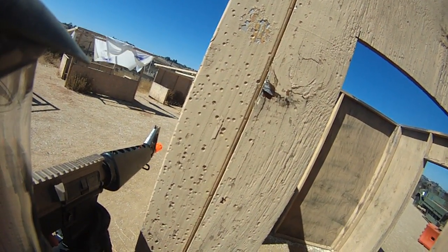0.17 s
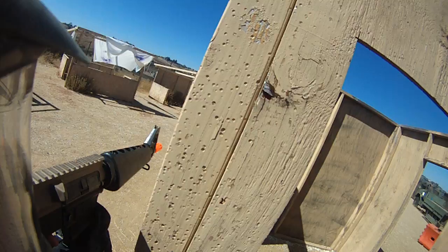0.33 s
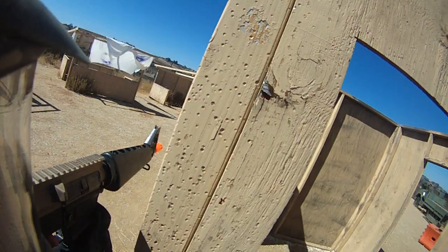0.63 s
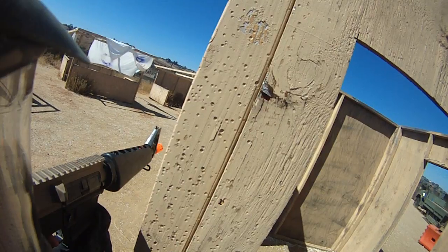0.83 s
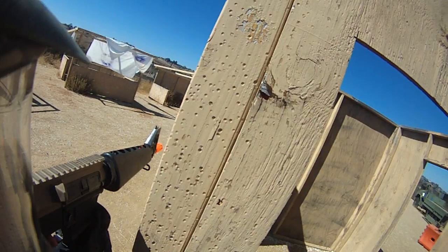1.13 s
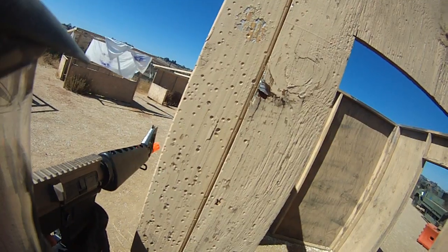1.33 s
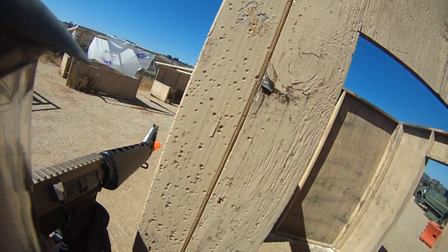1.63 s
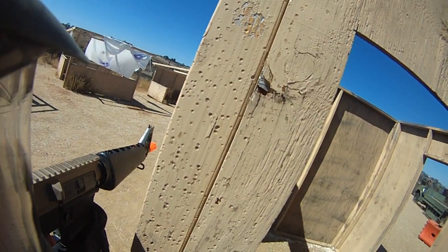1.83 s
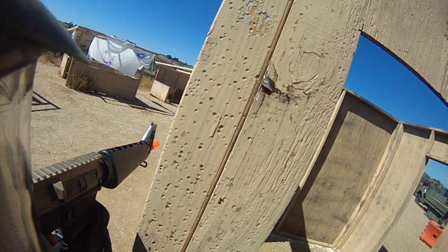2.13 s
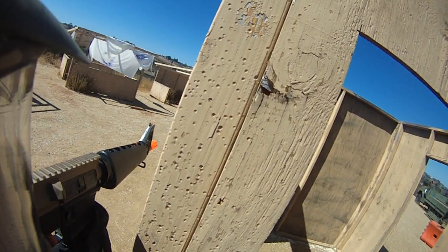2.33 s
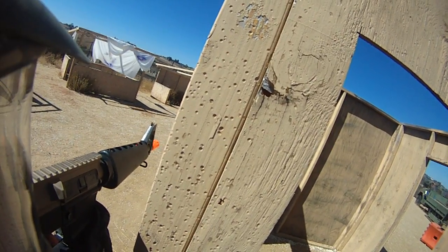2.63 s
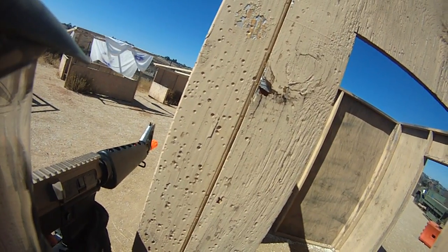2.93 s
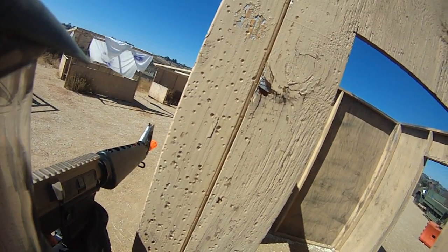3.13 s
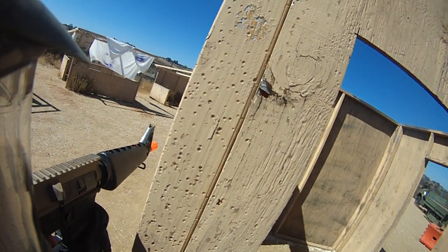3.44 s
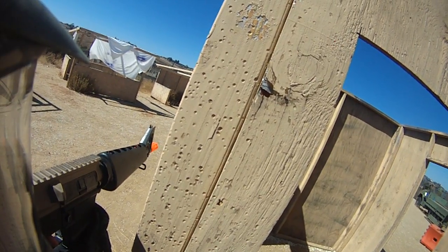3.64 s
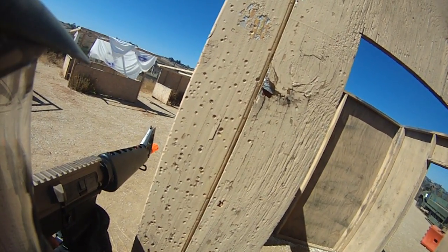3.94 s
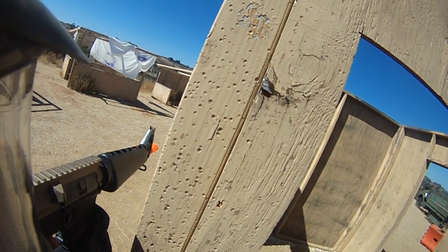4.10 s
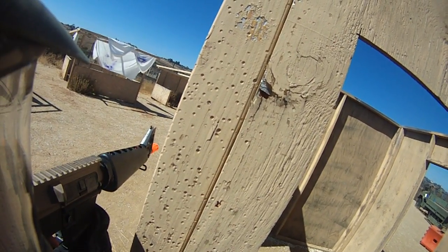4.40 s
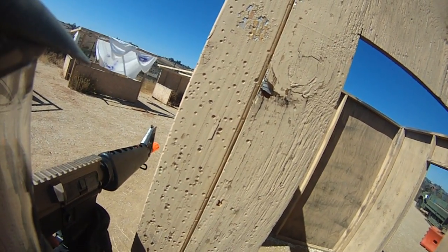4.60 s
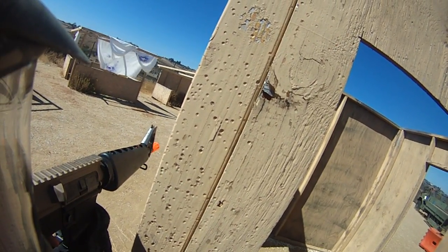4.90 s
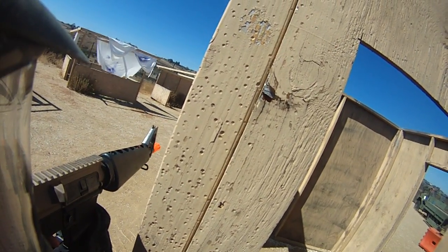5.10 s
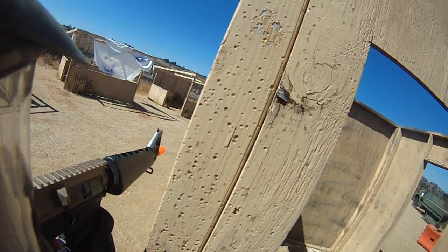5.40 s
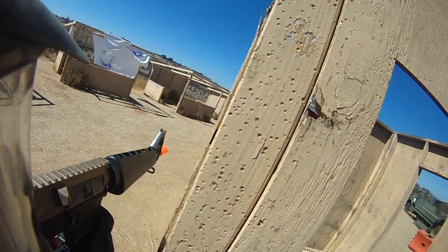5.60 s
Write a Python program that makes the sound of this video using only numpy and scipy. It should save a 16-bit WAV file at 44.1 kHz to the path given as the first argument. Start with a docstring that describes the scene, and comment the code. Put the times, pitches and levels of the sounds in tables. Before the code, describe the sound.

Outdoors, a close electric toy rifle fires four whirring, clacking single shots, then a nearby gas pistol cracks four times with its slide clacking shut.

```python
"""Airsoft game between plywood walls

Heard outdoors, at a microphone on a player's head. His electric rifle fires four single shots:
noisy gears wind up, bursts of noise make the piston slam and the body rings, then the motor coasts down.
Then a gas pistol close by cracks four times, its slide clacking shut after each.
Shaped noise and fading tones make pellets, clicks and bumps; filtered noise makes breeze and hiss."""
import sys
import numpy as np
from scipy import signal
from scipy.fft import rfft, irfft
from scipy.io import wavfile
from scipy.ndimage import uniform_filter1d

SR = 44100
rng = np.random.default_rng(int(sys.argv[2]) if len(sys.argv) > 2 else 0)


def unload_wav(signal):
    """Save mono or channel-first audio to the path in sys.argv[1] as 16-bit WAV at rate SR, clipped to [-1, 1]."""
    wavfile.write(
        sys.argv[1],
        SR,
        np.round(np.clip(np.atleast_2d(signal).T, -1, 1) * 32767).astype(np.int16),
    )


N = 253861  # length in samples
AGE = np.arange(16384) / SR  # seconds since a blow

# In every table: level_db in a spectrum is relative, as filters are evened out in power.
# decay_s is the time to fall 60 dB; for noise bursts, a further bell-shaped fade shortens it.
# Event levels are those of the direct sound, before echoes and the microphone.

# Piston slams of the rifle: start_s, peak_db, rattle_base_db, whine_base_db, jolt_db
RIFLE_SHOTS = [(1.3604, -10.5, -30.5, -26.5, 13.5), (1.7012, -13, -33, -31.5, 4),
               (2.1437, -14, -33.5, -33.5, 4), (2.9072, -14, -33.5, -34.5, 5.5)]
# Spectrum of the gear rattle: pitch_hz, level_db
GEAR_TONE = [(71, -54.5), (120, 0), (280, -13), (420, -4.5), (770, -1.5), (1130, -8), (1530, -4),
             (1830, -12.5), (2590, -0.5), (3500, -16), (4740, -9), (5460, -23.5), (6420, -19.5),
             (7700, -28), (15000, -42)]
# Spectrum of the piston blow: pitch_hz, level_db
PISTON_TONE = [(200, -15), (600, -13), (1000, 2.5), (1600, -14.5), (2300, 3), (2800, 4.5), (3500, -15.5),
               (5000, -17.5), (7000, -21.5), (9000, -42.5), (15000, -49.5)]
# Spectrum of the stock's thud: pitch_hz, level_db
THUD_TONE = [(25, -22), (70, -7), (160, 0), (260, -1), (380, 1.5), (520, -9.5), (900, -29.5), (2000, -49.5)]
# Ringing of the rifle's body: pitch_hz, typical_level_db, decay_s
RIFLE_MODES = [(91, -15, 0.3), (153, -15.5, 0.13), (379, -8.5, 0.069), (463, -22, 0.34), (585, -33, .2),
               (4143, -39.5, .3), (4406, -39, .22)]
# Sharp snaps of the gear latch after a shot: start_s, peak_db
LATCH_SNAPS = [(1.3865, -40), (1.3945, -15), (1.4205, -33), (1.7285, -25.5), (2.1795, -31), (2.9412, -16.5)]
# Spectrum of the latch: pitch_hz, level_db
LATCH_TONE = [(400, -22.5), (800, -4), (1800, -2.5), (2600, 2), (3100, 3), (4200, -7), (5400, -15),
              (7000, -13), (8700, -9.5), (11000, -24), (15000, -31.5)]
# Thin hiss of scraping gear teeth: pitch_hz, level_db
SCRAPE_TONE = [(4000, -25), (8500, 0.5), (11000, -5.5), (15000, -9)]
# Gas pistol: shot_s, crack_peak_db, crack_decay_s, slide_shuts_s, slide_peak_db
PISTOL_SHOTS = [(4.1003, -15.5, 0.082, 4.1480, -9.5), (4.3700, -5.5, 0.0077, 4.4141, -8.5),
                (4.779, -6.5, 0.0094, 4.8233, -9.5), (5.0602, -7, 0.0095, 5.1046, -9)]
# Spectrum of the pistol's crack: pitch_hz, level_db
CRACK_TONE = [(100, -44.5), (280, -19.5), (440, 1.5), (650, -9.5), (1100, -6), (2050, 2.5), (2700, -8),
              (3400, -5.5), (5000, -16.5), (6500, -12), (7500, -24.5), (10000, -19), (15000, -38.5)]
# Spectrum of the escaping gas: pitch_hz, level_db
GAS_TONE = [(88, -33), (150, -28), (352, -8.5), (500, -9.5), (1020, -6), (1480, -5.5), (1630, -15.5),
            (2500, 3), (3100, -8), (3550, -15), (6600, -16), (7560, -21.5), (12300, -31), (15500, -58)]
# Spectrum of the steel slide: pitch_hz, level_db
STEEL_TONE = [(150, -50.5), (400, -27), (620, -15), (900, 0.5), (1400, -8), (1950, 1.5), (2800, -9.5),
              (4100, -10.5), (6400, -13), (7500, -17.5), (10000, -19.5), (15000, -32)]
# Spectrum of the low gas puff: pitch_hz, level_db
PUFF_TONE = [(80, -36), (150, -14.5), (220, -2), (310, -4), (400, 4), (500, -8.5), (620, -16),
             (1000, -33.5)]
# A metal part of the pistol snaps home: start_s, peak_db
COCK_SNAPS = [(3.9262, -25.5), (3.9308, -20)]
# Spectrum of that snap: pitch_hz, level_db
COCK_TONE = [(71, -41.5), (120, -11), (514, -4), (1020, -22), (2200, -5.5), (2480, -18), (3360, -26),
             (3800, -26.5), (4460, -25.5), (5040, -50), (6290, -27.5), (8690, -24), (15000, -51)]
# Ringing of that part: pitch_hz, typical_level_db, decay_s
COCK_MODES = [(443, -21.5, 0.095), (1306, -16.5, 0.047), (1490, -23, 0.065), (2260, -13, 0.1),
              (2685, -21, 0.082), (3310, -20, 0.056), (4405, -18.5, 0.048), (5400, -32.5, .14),
              (6540, -44, .2), (7540, -21.5, .05)]
# Pellets striking a board: start_s, peak_db
PELLET_HITS = [(4.0697, -32), (4.554, -33), (4.6316, -32.5), (5.215, -30.5), (5.3081, -31)]
# Spectrum of the hit: pitch_hz, level_db
BOARD_TONE = [(500, -18), (1500, -12), (2000, 5.5), (2700, -4.5), (3800, -16.5), (5500, -1.5),
              (7000, -21.5), (14000, -32.5)]
# Spectrum of the board's hollow answer: pitch_hz, level_db
BOARD_RING = [(1200, -12.5), (2000, 0), (2400, 12), (2900, -17), (4000, -45)]
# Dry clicks of a gun being handled: start_s, peak_db
HANDLING_CLICKS = [(0.134, -30), (0.385, -32), (0.615, -31.5)]
# Spectrum of those clicks: pitch_hz, level_db
CLICK_TONE = [(200, -19.5), (450, -7), (640, -8), (900, -20.5), (1400, -15.5), (1900, 7.5), (2400, -7.5),
              (2900, 3), (3500, -17), (4700, -7), (7000, -19.5), (14000, -35)]
# Their hollow ring: pitch_hz, typical_level_db, decay_s
CLICK_MODES = [(655, -25, 0.17)]
# Clearest small ticks of pellets and kit: start_s, base_level_db, pitch_hz
CLEAR_TICKS = [(0.426, -42, 2350), (0.507, -41, 1230), (0.576, -41, 2300), (0.647, -42.5, 1927),
               (0.717, -41.5, 2830), (0.786, -40, 1900), (0.87, -38.5, 2320), (1.206, -40, 1880),
               (1.56, -45, 1930), (1.939, -42, 1264), (2.402, -47, 1090), (3.173, -42, 821),
               (3.645, -40.5, 821), (4.024, -36.5, 810), (5.505, -45.5, 937), (5.636, -44, 4190)]
# Clearest soft bumps of clothing and straps: start_s, peak_db, decay_s
CLOTH_BUMPS = [(.14, -47, 0.37), (3.879, -43.5, 0.045), (5.449, -46, .024), (5.509, -42.5, 0.076),
               (5.523, -45.5, 0.04), (5.603, -44.5, 0.069), (5.619, -47, 0.091)]
# Spectrum of a dull bump: pitch_hz, level_db
BUMP_TONE = [(30, 0.5), (100, 5.5), (200, 7), (400, -9.5), (800, -15), (2000, -51.5)]
# Reflections from the walls: delay_s, base_level_db, smear_decay_s
WALLS = [(.0042, -10.5, .015), (.012, -9, 0.053), (0.0294, -10, 0.022), (.047, -18.5, .04),
         (.068, -26, .03)]
# Tone of all reflections: pitch_hz, level_db
FIELD_TONE = [(100, -20), (500, -1.5), (900, 3), (2000, 0), (6500, 0), (9000, -1.5), (15000, 0.5)]
# Spectrum of the breeze: pitch_hz, level_db
BREEZE_TONE = [(13, -24), (22, 1), (102, -7), (140, -3.5), (274, -5), (443, -7.5), (536, -15), (610, -14.5),
               (1000, -25), (1300, -61.5), (2200, -120)]
# The breeze comes and goes: time_s, base_level_db
GUSTS = [(0, -65), (.7, -72), (1.35, -58.5), (2.1, -60.5), (2.4, -72.5), (3.1, -61), (3.65, -61.5),
         (4.05, -57), (4.65, -68.5), (5.76, -68)]
# Spectrum of the background hiss: pitch_hz, level_db
HISS_TONE = [(350, -24.5), (600, 0.5), (855, -5.5), (927, -1.5), (993, -4), (1450, -5.5), (2400, -5.5),
             (2640, -9.5), (4430, -12), (14700, -19.5), (15500, -21)]
# Rise and fall of the hiss: time_s, base_level_db
HISS_LEVEL = [(0, -62.5), (1.25, -63.5), (1.6, -68), (3.55, -70.5), (3.85, -63.5), (5.3, -61), (5.76, -69)]
# Ripple from the microphone port: pitch_hz, level_db
PORT_TONE = [(3000, 0.5), (3600, -0.5), (4600, 1.5), (5400, -5.5), (6100, 5), (6700, 4), (7500, -2.5),
             (9500, -0.5), (11000, -3.5), (13000, -1)]
# Slight stereo spread of the sound: pitch_hz, level_db
SPREAD_TONE = [(60, -0.5), (200, 13), (500, 11), (1200, -5.5), (5000, -5), (14000, 5.5)]
# Stereo spread of the noise floor: pitch_hz, level_db
SIDE_NOISE_TONE = [(24, -65.5), (40, -30.5), (82, -22), (173, -6), (514, 2.5), (2220, -5), (5990, -2),
                   (15000, -4.5)]

# The motor starts before the slam, nears top speed (SPIN_UP_S is its time constant), then coasts to rest
WIND_UP_S, SPIN_UP_S, TOP_MESH_HZ = .094, .027, 1747
COAST_S, COAST_SHAPE, COAST_DB_PER_S = 0.15, 1.5, -102.5
# Gear noise grows as a power of speed; the whine drops when the spring is let go, just before the slam
RATTLE_POWER, WHINE_POWER, UNLOAD_S, UNLOADED_DB = 1.06, 4, 0.0091, -17.5
SCRAPE_DB, SCRAPE_POWER = -26.5, 4
# The gears come to rest with a click and a dull knock (seconds after the slam, peak dB)
REST_CLICK_S, REST_CLICK_DB, REST_KNOCK_S, REST_KNOCK_DB = .105, -42, .118, -37
SPRING_HZ = 668
# Middle of the random ticks' base level and pitch
STRAY_DB, STRAY_HZ = -56, 2204
TOP_HZ = 15300  # the treble is cut above this


def rifle(release_s=.0075, release_db=-10, rebound_s=.003, rebound_db=-2, thud_db=-5, shudder_db=-12,
          spring_db=-47, spring_t60=2.9):
    """Wind-up, piston release, slam and rebound; the stock thuds, gears come to rest and the spring rings."""
    out, muted = np.zeros(N), np.zeros(N)
    modes = list(RIFLE_MODES) + [(SPRING_HZ, spring_db, spring_t60)]
    for s, db, rattle_db, whine_db, jolt_db in RIFLE_SHOTS:
        add(out, s - WIND_UP_S, gearbox(rattle_db, whine_db))
        release = strike(LATCH_TONE, .008, 0.39) + strike(THUD_TONE, 0.027, .5)
        add(out, s - release_s, undb(db + release_db) * release)
        add(out, s, undb(db) * strike(PISTON_TONE, 0.011, .4))
        rebound = s + rebound_s
        add(out, rebound, undb(db + rebound_db) * strike(PISTON_TONE, 0.015, .4))
        add(out, rebound, undb(db + thud_db) * strike(THUD_TONE, .05, 0.55))
        add(out, rebound, undb(db + shudder_db) * strike(THUD_TONE, 0.24, 0))
        add(out, rebound, undb(db) * ring(modes, 2))
        add(out, s + REST_CLICK_S, undb(REST_CLICK_DB) * strike(GEAR_TONE, 0.063, .2))
        add(out, s + REST_KNOCK_S, undb(REST_KNOCK_DB) * strike(BUMP_TONE, .045, .15))
        add(muted, s, choke(undb(jolt_db)))
    return out * (1 - muted) + blows(LATCH_SNAPS, LATCH_TONE, t60=0.01, snap=.3)


def gearbox(rattle_db, whine_db, rough=0.31, overtone_db=-4, shaft_db=-16, wobble=0.018, uneven_db=2.2,
            rattle_top_db=-1, whine_top_db=5.0, unload_ramp_s=0.016):
    """The motor winds the spring and coasts; meshing teeth sweep through case resonances and rattle."""
    t = np.arange(-WIND_UP_S, COAST_S, 1 / SR)
    speed = motor(t)
    coast_db = COAST_DB_PER_S * np.maximum(t, 0)
    unloaded = np.clip((t + UNLOAD_S) / unload_ramp_s + .5, 0, 1)
    rattle_gain = speed ** RATTLE_POWER * undb(rattle_db + rattle_top_db + coast_db)
    whine_gain = speed ** WHINE_POWER * undb(whine_db + whine_top_db + coast_db + UNLOADED_DB * unloaded)
    scrape_gain = speed ** SCRAPE_POWER * undb(rattle_db + SCRAPE_DB + coast_db)

    mesh_hz = TOP_MESH_HZ * speed * (1 + wobble * walk(300)[:len(t)])
    tooth = 2 * np.pi * np.cumsum(mesh_hz) / SR  # phase of the meshing teeth
    shaft = np.sin(tooth / 10)  # the pinion has ten teeth
    contact = (1 + rough * shaft) * (1 + rough * np.sin(tooth))
    contact *= undb(uneven_db * (walk(700)[:len(t)] - .5))  # backlash: some teeth knock harder than others

    clatter = colour(contact * rng.standard_normal(N)[:len(t)], GEAR_TONE) + undb(shaft_db) * shaft
    overtones = sum(undb(overtone_db * np.log2(k)) * np.sin(k * tooth) for k in range(1, 5))
    whine = colour((1 + rough * shaft) * overtones, GEAR_TONE)
    whine /= whine.std() * np.sqrt(2)
    scrape = colour(contact * rng.standard_normal(N)[:len(t)], SCRAPE_TONE)
    return scrape_gain * scrape + rattle_gain * clatter + whine_gain * whine


def motor(t):
    """Share of top speed at t seconds from the slam: a quick spin-up, then friction brakes it."""
    spin_up = 1 - np.exp(-np.maximum(t + WIND_UP_S, 0) / SPIN_UP_S)
    return spin_up * (1 - np.clip(t / COAST_S, 0, 1) ** COAST_SHAPE)


def choke(depth, swing_hz=62, delay_s=.0148, t60=0.26):
    """A shot's jolt swings the microphone to its stop, muting it for a few ms, once per cycle."""
    t = AGE - delay_s
    started = t > -.5 / swing_hz
    swing = depth * np.maximum(np.cos(2 * np.pi * swing_hz * t), 0) ** 2 * fade(t, t60) * started
    return 1 - 1 / (1 + swing ** 4)


def pistol(hammer_s=.006, hammer_db=-22, swell_s=0.0031, puff_s=.0115, puff_db=-19, stop_s=.0155, stop_db=-16,
           gas_db=-20, gas_t60=0.077, feed_s=.03, feed_db=-21, lock_s=.005, lock_db=-8):
    """Hammer falls, shot cracks, gas blows the slide back to its stop; it feeds a pellet, shuts and locks."""
    out = np.zeros(N)
    for s, db, t60, shut_s, shut_db in PISTOL_SHOTS:
        shot = np.zeros(N)
        hammer = strike(STEEL_TONE, 0.11, 0) * np.minimum(AGE / swell_s, 1) ** 2
        add(shot, s - hammer_s, undb(db + hammer_db) * hammer)
        add(shot, s, undb(db) * strike(CRACK_TONE, t60, 0.59))
        puff = undb(puff_db) * strike(PUFF_TONE, 0.034, 0.9)
        gas = undb(gas_db) * strike(GAS_TONE, gas_t60, 0.12)
        add(shot, s + puff_s, puff + gas)
        add(shot, s + stop_s, undb(stop_db) * strike(GAS_TONE, 0.019, 0.44))
        add(shot, s + feed_s, undb(feed_db) * strike(STEEL_TONE, 0.014, 0.47))
        add(shot, shut_s, undb(shut_db) * strike(STEEL_TONE, 0.018, 0.29))
        add(shot, shut_s + lock_s, undb(shut_db + lock_db) * strike(STEEL_TONE, 0.0081, 0.26))
        # each shot gets its own freshly drawn echoes
        out += shot + field(shot, walls_db=-2, tail_db=-17.5, t60=0.36)
    return out


def pellets(ring_s=0.0076, ring_db=-4):
    """A pellet cracks on a board, which answers with a short hollow note."""
    note = blows(np.array(PELLET_HITS) + [ring_s, ring_db], BOARD_RING, t60=0.041, snap=0)
    return blows(PELLET_HITS, BOARD_TONE, t60=0.027, snap=0.35) + note


def handling():
    """Dry clicks with a brief hollow note, and a double metallic click that rings."""
    out = blows(HANDLING_CLICKS, CLICK_TONE, t60=0.027, snap=0.36)
    out += blows(COCK_SNAPS, COCK_TONE, t60=0.018, snap=0.27)
    for events, modes in ((HANDLING_CLICKS, CLICK_MODES), (COCK_SNAPS, COCK_MODES)):
        for s, db in events:
            add(out, s, undb(db) * ring(modes, .5))
    return out


def ticks(t60=0.022, below_db=-18, above_db=-17, trim_db=-0.5):
    """Faint ticks, each a broad resonance at its own pitch."""
    out = np.zeros(N)
    for s, db, hz in list(CLEAR_TICKS) + stray_ticks():
        spectrum = [(hz / 4, below_db), (hz, 0), (hz * 4, above_db), (hz * 8, 2 * above_db)]
        add(out, s, undb(db + trim_db) * strike(spectrum, t60, 0.53))
    return out


def stray_ticks(count=8, scatter_db=3.0, scatter_octaves=.6):
    """Fainter ticks at random moments, scattered in level and pitch: start_s, base_level_db, pitch_hz."""
    times = rng.uniform(0, N / SR, count)
    chance = rng.standard_normal((count, 2))
    return [(s, STRAY_DB + scatter_db * a, STRAY_HZ * 2 ** (scatter_octaves * b))
            for s, (a, b) in zip(times, chance)]


def clothing():
    """Cloth and straps bump dully near the microphone."""
    out = np.zeros(N)
    for s, db, t60 in CLOTH_BUMPS:
        add(out, s, undb(db) * strike(BUMP_TONE, t60, 0.15))
    return out


def field(x, walls_db, tail_db, t60):
    """Smeared echoes come back from nearby plywood walls, and a noisy tail from the field beyond."""
    t = np.arange(SR) / SR
    response = undb(tail_db) * burst(t60, t) * (1 - fade(t, 0.089))  # the tail builds up, then dies
    for delay, db, smear in WALLS:
        add(response, delay, undb(db + walls_db) * burst(smear))
    return signal.fftconvolve(x, colour(response, FIELD_TONE))[:N]


def air(breeze_db=1, hiss_db=-1, gust_db=2, flicker_db=1):
    """A light breeze rumbles at the microphone over a faint hiss; both waver in level."""
    t = np.arange(N) / SR
    breeze_level = np.interp(t, *np.transpose(GUSTS)) + breeze_db + gust_db * walk(18)
    breeze = colour(rng.standard_normal(N), BREEZE_TONE) * undb(breeze_level)
    hiss_level = np.interp(t, *np.transpose(HISS_LEVEL)) + hiss_db + flicker_db * walk(10)
    hiss = colour(rng.standard_normal(N), HISS_TONE) * undb(hiss_level)
    return breeze + hiss


def undb(db):
    """Decibels to gain."""
    return 10 ** (np.asarray(db) / 20)


def add(track, s, sound):
    """Mix a sound into a track from time s on."""
    start = max(int(s * SR), 0)
    part = sound[:max(len(track) - start, 0)]
    track[start:start + len(part)] += part


def colour(x, spectrum, size=2048):
    """Filter through (pitch_hz, level_db) points without pre-echo; white noise keeps its power."""
    hz, db = np.transpose(spectrum)
    grid = np.log(np.maximum(np.arange(size // 2 + 1) * SR / size, 1))
    # folding the cepstrum (spectrum of the log spectrum) makes the filter act as early as it can
    cepstrum = irfft(np.log(undb(np.interp(grid, np.log(hz), db))))
    cepstrum[1:size // 2] *= 2
    cepstrum[size // 2 + 1:] = 0
    response = irfft(np.exp(rfft(cepstrum)))
    return signal.fftconvolve(x, response / np.linalg.norm(response))[:len(x)]


def fade(t, t60):
    """Exponential decay, 60 dB down after t60 seconds."""
    return np.exp(-np.log(1000) * t / t60)


def burst(t60, t=AGE, snap=0):
    """An impulse (snap) and decaying noise, with an evened-out spectrum and unit energy."""
    x = rng.standard_normal(len(t)) * fade(t, t60)
    x /= np.linalg.norm(x)
    x[0] -= snap
    spectrum = rfft(x)
    bins = max(int(5 * t[-1] / t60), 1)
    smooth_power = uniform_filter1d(np.abs(spectrum) ** 2, bins)
    x = irfft(spectrum / np.sqrt(smooth_power), len(t))
    x *= np.exp(-(t / t60) ** 2)
    return x / np.linalg.norm(x)


def strike(spectrum, t60, snap):
    """One blow with peak 1: an impulse of strength snap and the dense ringing after it."""
    x = colour(burst(t60, snap=snap), spectrum)
    return x / np.abs(x).max()


def blows(events, spectrum, t60, snap):
    """A track of like blows from rows of start_s, peak_db."""
    out = np.zeros(N)
    for s, db in events:
        add(out, s, undb(db) * strike(spectrum, t60, snap))
    return out


def ring(modes, length):
    """Decaying tones, never struck quite the same way twice."""
    t = np.arange(int(length * SR)) / SR
    return sum(undb(db + rng.normal()) * fade(t, t60) * np.sin(2 * np.pi * hz * t) for hz, db, t60 in modes)


def walk(rate):
    """Random wander, smoothed between about rate new values a second."""
    k = int(SR / rate)
    steps = np.repeat(rng.standard_normal(N // k + 1), k)
    return uniform_filter1d(steps, k)[:N]


def scene():
    """All sources with their reflections, nearly the same in both channels."""
    own = rifle()
    small = pellets() + ticks() + handling()
    mix = pistol() + own + field(own, walls_db=-22.5, tail_db=-38.0, t60=0.46)
    mix += small + field(small, walls_db=-6.0, tail_db=-18.0, t60=0.69)
    mid = colour(mix, PORT_TONE) + air() + clothing()
    # the side signal is what differs between left and right
    smeared = signal.fftconvolve(mid, burst(.004))[:N]
    side = undb(-44) * colour(smeared, SPREAD_TONE)
    side += undb(-77.5) * colour(rng.standard_normal(N), SIDE_NOISE_TONE)
    return np.array([mid + side, mid - side])


def record(dry):
    """The loudest peaks are rounded off, then the top of the treble is cut."""
    ceiling = .5
    rounded = ceiling * np.tanh(dry / ceiling)
    return signal.sosfilt(signal.ellip(8, .2, 70, TOP_HZ, fs=SR, output="sos"), rounded)


dry = scene()
out = record(dry)
unload_wav(out)
```